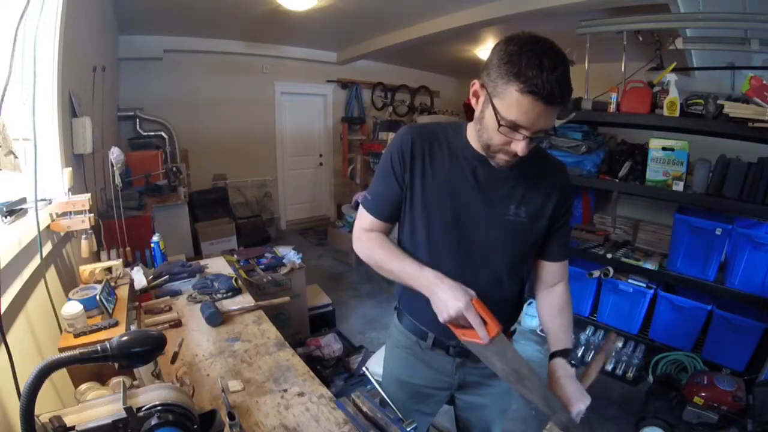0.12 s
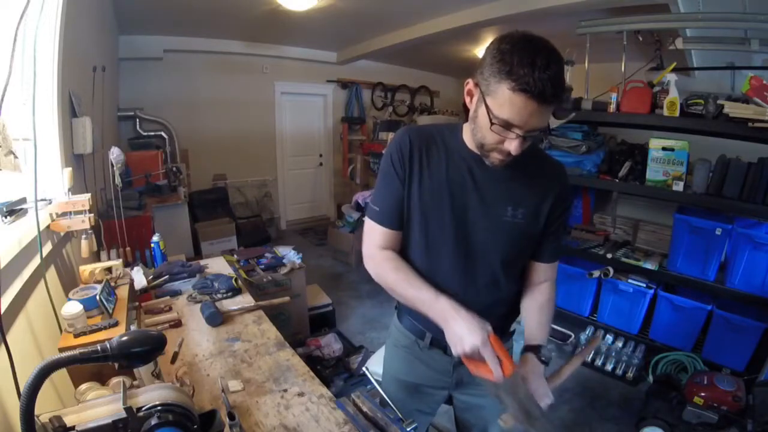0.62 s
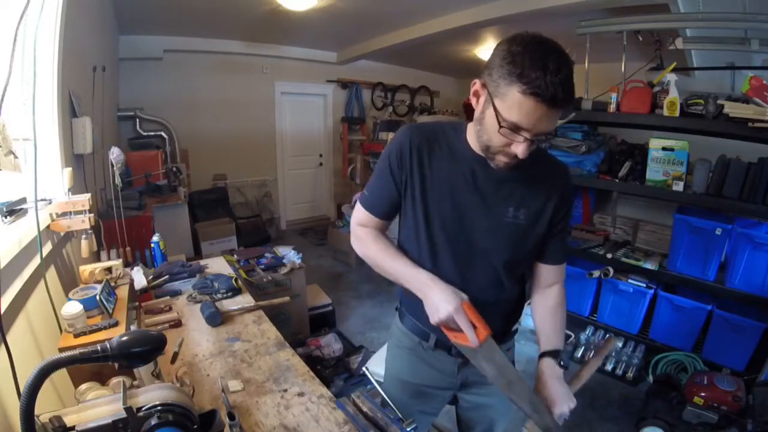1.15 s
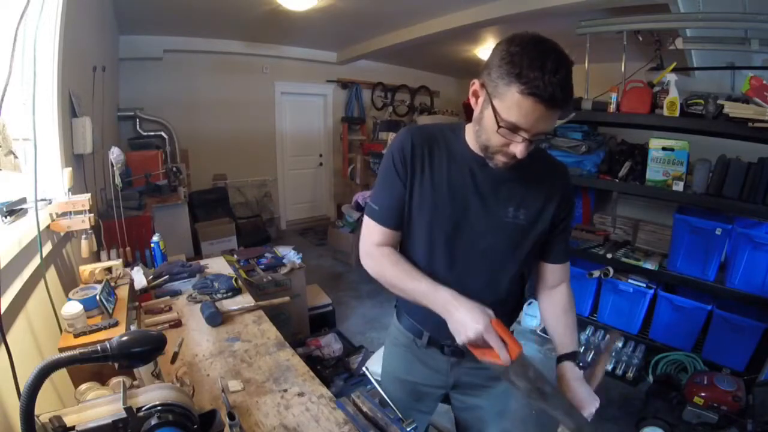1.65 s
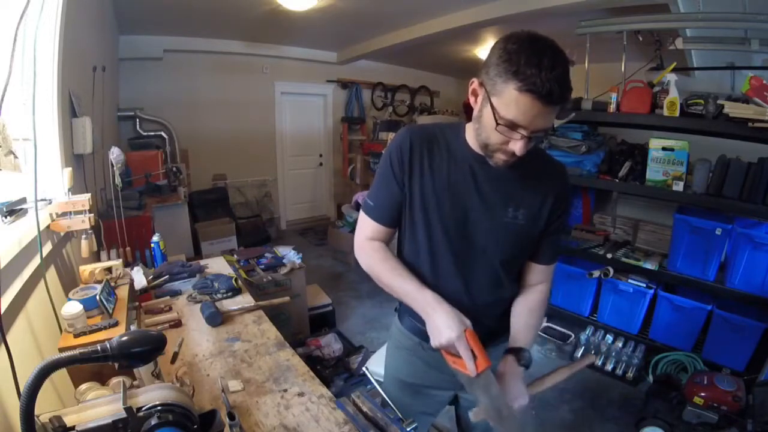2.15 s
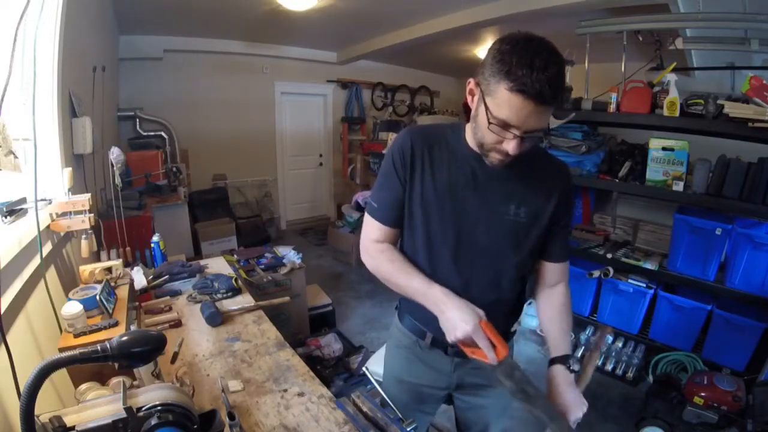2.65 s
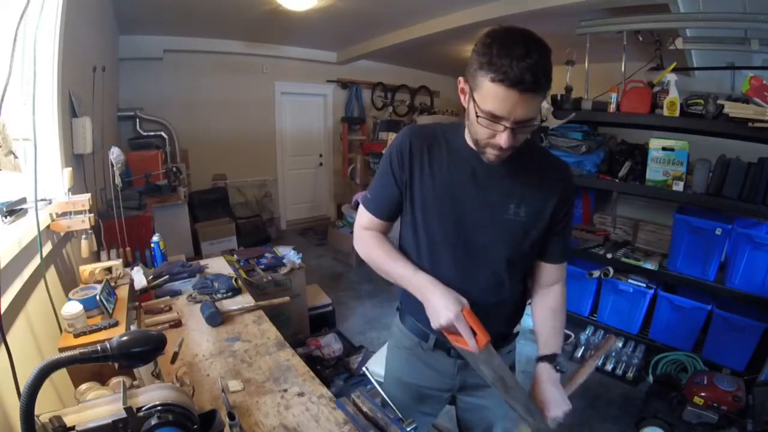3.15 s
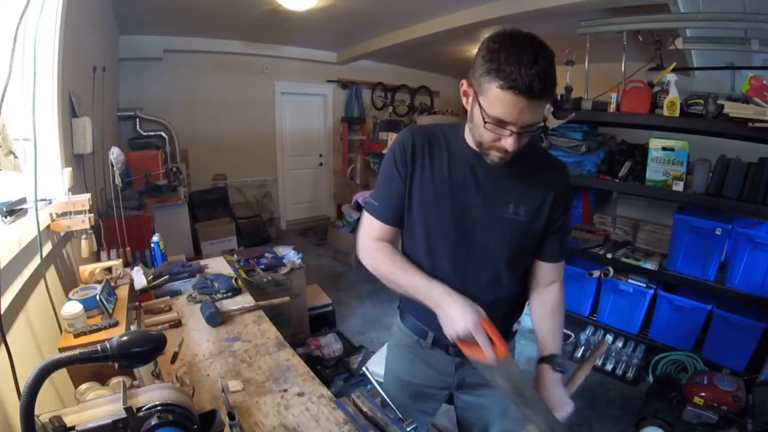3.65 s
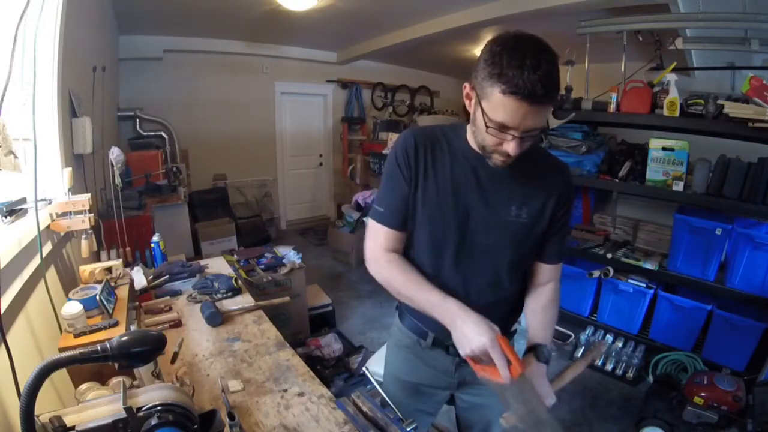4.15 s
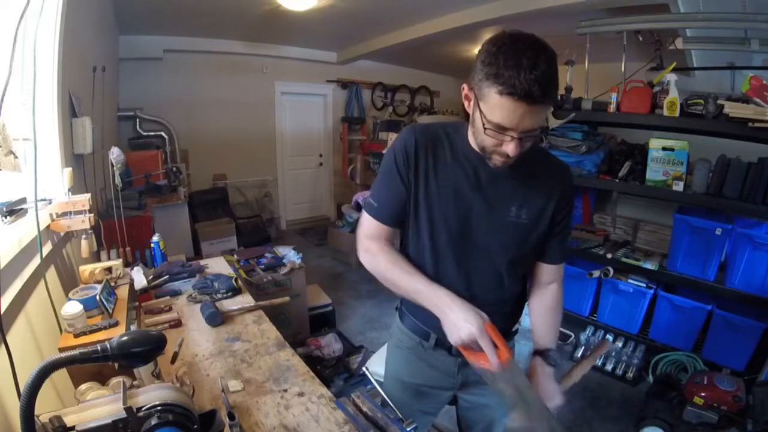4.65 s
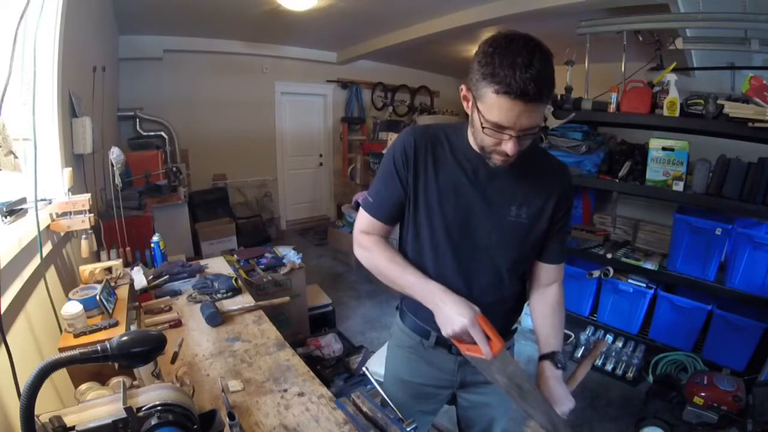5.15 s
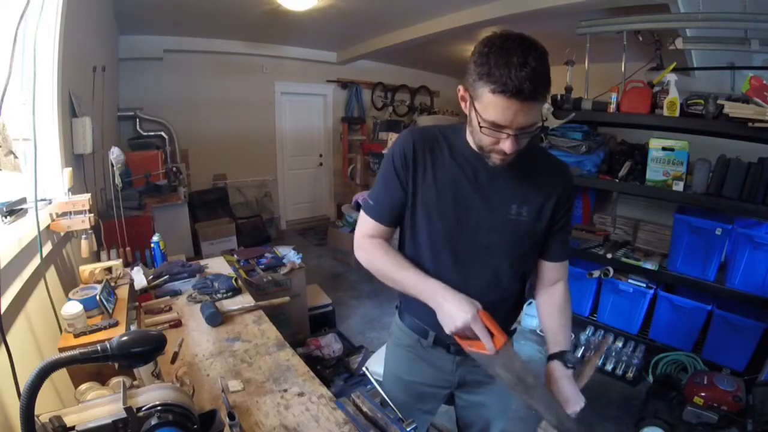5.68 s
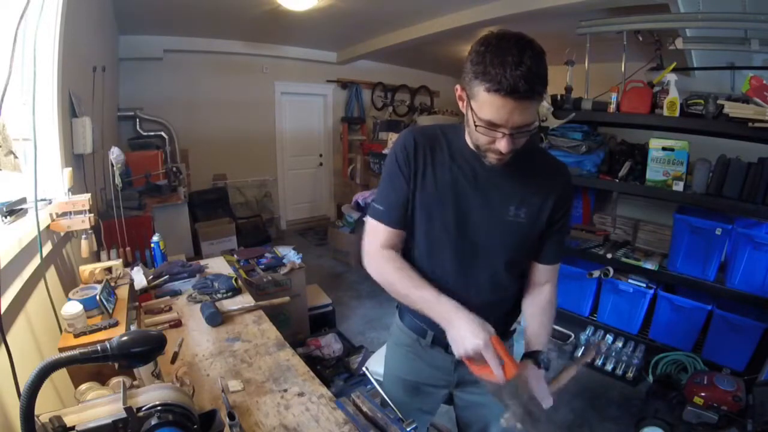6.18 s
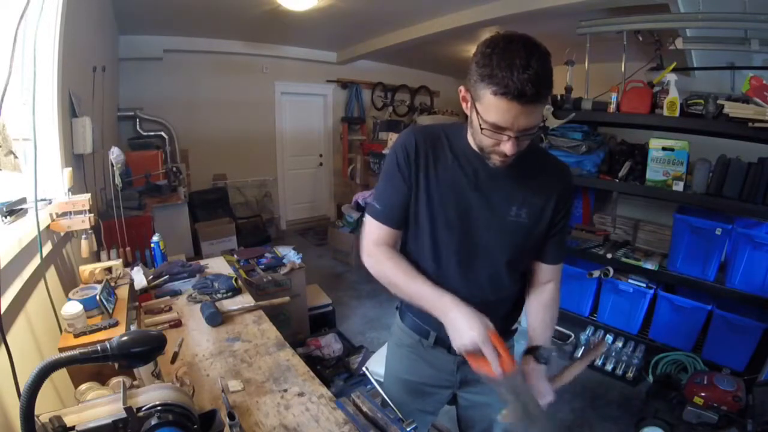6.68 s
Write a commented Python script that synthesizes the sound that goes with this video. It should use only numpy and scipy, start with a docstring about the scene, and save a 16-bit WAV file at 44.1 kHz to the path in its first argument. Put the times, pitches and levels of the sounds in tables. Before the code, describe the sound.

Close, dry-edged rasping of saw teeth in wood, louder on the push and thinner on the pull. Strokes start hesitantly, stop for over a second of small scrapes, then run quickly and regularly before another short halt and a sharp restart. Short metallic notes and snagging bursts colour the rasp. The hard garage adds a brief diffuse tail, with faint hum and hiss underneath.

```python
"""Garage: a hand saw cuts a wooden handle in quick strokes with short pauses.
Pulsed noise, the tearing fibres, drives resonances of the body and blade; its level follows the arm speed.
On each push the tooth rate sweeps up and down as a pitch. The steel blade sings short notes and the
teeth catch in brief noise bursts.
The garage answers with a short tail of decaying noise, over a low hum and hiss of filtered noise."""
import sys
import numpy as np
from scipy import signal
from scipy.fft import rfft, irfft, next_fast_len
from scipy.io import wavfile
from scipy.ndimage import map_coordinates

SR = 44100
rng = np.random.default_rng(int(sys.argv[2]) if len(sys.argv) > 2 else 0)


def amplitude_ratio(level_db):
    """Convert a level in decibels to the matching linear amplitude (field) ratio."""
    exponent = np.asarray(level_db, float) / 20
    return 10 ** exponent


def bounce(signal):
    """Save signal as a 16-bit WAV file at the path given by the first command-line argument."""
    frames = np.transpose(np.atleast_2d(signal))
    limited = np.clip(frames, -1, 1)
    pcm = np.round(limited * 32767).astype(np.int16)
    wavfile.write(sys.argv[1], SR, pcm)


N = 299880
TIME = np.arange(N) / SR

# push strokes, levels before layer trims:
# (start [s], fastest [s], end [s], rasp level [dB], body over rasp [dB])
PUSH_STROKES = [(0.423, 0.526, 0.64, -26, -7), (0.823, 0.925, 0.98, -23.5, -7.5),
                (1.153, 1.258, 1.307, -24, -9), (1.77, 1.867, 1.932, -23.5, -9),
                (2.796, 2.902, 2.96, -25.5, -6.5), (3.14, 3.239, 3.28, -25.5, -8),
                (3.436, 3.532, 3.62, -26, -10.5), (3.75, 3.831, 3.89, -24.5, -7.5),
                (4.067, 4.14, 4.245, -24.5, -8.5), (4.333, 4.426, 4.47, -24.5, -9.5),
                (4.62, 4.684, 4.756, -25, -6.5), (4.899, 4.958, 5.03, -23.5, -9),
                (5.16, 5.236, 5.29, -24.5, -7.5), (5.989, 6.112, 6.17, -24, -7),
                (6.331, 6.422, 6.466, -24.5, -7.5), (6.622, 6.706, 6.75, -24.5, -8.5)]
# modes of blade and handle: (centre [Hz], width [Hz], relative level [dB])
BODY_MODES = [(357, 18, -15), (497, 97, 1.5), (602, 121, -3), (872, 57, 7), (1036, 150, 1), (1104, 37, 7),
              (1335, 69, 1.5), (1382, 97, 10.5), (1466, 114, 1.5), (1540, 13.5, 3.5), (1693, 180, -14),
              (1980, 25, -35), (2085, 34, -1.5), (2264, 60, 7), (2730, 250, -9)]
# rasp noise colour: (frequency [Hz], relative density [dB per Hz])
RASP_SPECTRUM = [(150, -83), (250, -17.5), (435, -18.5), (799, -10), (870, -14), (1330, -2), (3120, -10),
                 (4700, -5.5), (5420, -12), (6330, -8), (7400, -41.5), (9620, -34), (16300, -120)]


def unit(x):
    """x at rms 1."""
    return x / np.sqrt(np.mean(x ** 2) + 1e-20)


def along(points, hz):
    """Interpolates (Hz, value) points on a log frequency axis."""
    f, v = np.transpose(points)
    return np.interp(np.log(hz + 1), np.log(f + 1), v)


def wobble(knots_per_s):
    """Smooth random curve through normally distributed knots."""
    knots = rng.standard_normal(int(N * knots_per_s / SR) + 4)
    return map_coordinates(knots, [TIME * knots_per_s])


def filtered(x, response):
    """x times a complex response of frequency."""
    m = next_fast_len(N + SR // 2)
    return irfft(rfft(x, m) * response(np.fft.rfftfreq(m, 1 / SR)), m)[:N]


def coloured(x, spectrum):
    """x through a (Hz, dB) spectrum, at rms 1."""
    return unit(filtered(x, lambda hz: amplitude_ratio(along(spectrum, hz))))


def rung(x, modes, damp_db):
    """Parallel resonances at rms 1; kerf and hand damp each mode differently as the blade slides."""
    total = 0
    for k, (centre_hz, width_hz, db) in enumerate(modes):
        gain = amplitude_ratio(db + damp_db * wobble(14))
        mode = filtered(x, lambda f: 1j * f * width_hz / (centre_hz ** 2 - f * f + 1j * f * width_hz))
        total = total + (-1) ** k * gain * mode  # alternating signs
    return unit(total)


def room_floor():
    """Two filtered noises: a low hum of nearly even strength and a steady hiss."""
    # (frequency [Hz], relative density [dB per Hz])
    hum_spectrum = [(12, -8), (25, -8), (34, -5), (43, 0), (52, -6), (64, -18), (80, -40)]
    # (frequency [Hz], relative density [dB per Hz])
    hiss_spectrum = [(47, -4.5), (80, -5.5), (173, -15.5), (315, -15), (586, -21), (710, -22.5), (958, -24),
                     (1110, -19), (4110, -56), (6440, -26.5), (9270, -30), (12000, -42), (13300, -23.5)]
    hum = coloured(rng.standard_normal(N), hum_spectrum)
    hum = unit(hum / (.6 + np.abs(signal.hilbert(hum))))  # evens out the envelope
    hiss = coloured(rng.standard_normal(N), hiss_spectrum)
    return amplitude_ratio(-51.5) * hum + amplitude_ratio(-54.5) * hiss


def garage(x):
    """Noise tail, each frequency dying at its own speed; a fresh tail for each overlapping block."""
    # decay: (frequency [Hz], T60 [s])
    decay_times = [(300, 0.62), (1000, 0.47), (4000, 0.52), (8000, 0.44), (12000, 0.4)]
    step, delay_samples = SR // 5, 260
    padded = np.pad(x, (step, 2 * step))
    window = signal.windows.hann(2 * step, sym=False)
    out = np.zeros(N + 2 * SR)
    for at in range(0, N + step, step):
        hz, t, z = signal.stft(rng.standard_normal(SR * 2 // 3), SR, nperseg=256)
        decay = amplitude_ratio(-60 * t / along(decay_times, hz)[:, None])
        tail = signal.istft(z * decay, SR, nperseg=256)[1]
        wet = signal.fftconvolve(padded[at:at + 2 * step] * window, tail / np.linalg.norm(tail))
        out[at:at + len(wet)] += wet
    return np.pad(out[step:], (delay_samples, 0))[:N]


def singing():
    """Short unsteady sines of the blade, swelling fast and fading; some sag as the blade bends."""
    # steady notes: (start [s], length [s], pitch before waver [Hz], peak before flutter [dB])
    sung_notes = [(0.117, 0.062, 480, -50), (0.558, 0.055, 1463, -33.5), (0.716, 0.06, 885, -31),
                  (0.718, 0.052, 433, -43.5), (0.902, 0.13, 1300, -35.5), (1.086, 0.056, 876, -31),
                  (1.704, .06, 512, -47), (1.87, 0.088, 1556, -37), (1.876, 0.053, 1043, -41),
                  (2.205, 0.032, 968, -37.5), (2.249, 0.05, 514, -43), (2.876, 0.11, 1024, -39),
                  (2.929, 0.062, 1600, -39), (3.413, 0.052, 514.3, -39.5), (3.988, 0.094, 2076, -34),
                  (4.439, 0.039, 1033, -33), (4.717, 0.1, 1503, -39.5), (4.96, 0.059, 1025, -37.5),
                  (5.365, .05, 1598, -34.5), (6.095, 0.1, 1133, -35), (6.117, .03, 1700, -32),
                  (6.403, 0.037, 866, -37), (6.43, 0.11, 1550, -40), (6.516, 0.054, 964, -37.5)]
    # sagging notes: (start [s], length [s], peak before flutter [dB])
    sag_notes = [(1.249, 0.073, -39.5), (6.404, 0.1, -43), (6.689, 0.0745, -36)]
    sag_from_hz, sag_to_hz = 478, 343
    out, waver = np.zeros(N), 1 + .003 * wobble(70)
    notes = [(s, length_s, hz, hz, db) for s, length_s, hz, db in sung_notes]
    notes += [(s, length_s, sag_from_hz, sag_to_hz, db) for s, length_s, db in sag_notes]
    for s, length_s, first_hz, last_hz, db in notes:
        u = np.clip((TIME - s) / length_s, 0, 1)
        hz = last_hz + (first_hz - last_hz) * (1 - u) ** 2
        swell = np.sin(np.pi * u ** .65) ** .9
        out += amplitude_ratio(db) * swell * np.sin(2 * np.pi * np.cumsum(hz * waver) / SR)
    return out * amplitude_ratio(2 * wobble(60))  # flutter


def catches():
    """The teeth catch: sudden noise tears that die within some hundredths of a second."""
    # (start [s], nominal peak [dB])
    catch_times = [(0.115, -35), (0.436, -43), (1.701, -36), (1.809, -19), (2.21, -22.5), (3.793, -30),
                   (4.092, -23), (4.922, -26), (5.659, -38), (5.933, -48), (6.061, -21), (6.244, -16)]
    crest_db, t60_s = 9, .045  # crest: peak over rms
    start_s, peak_db = np.transpose(catch_times)
    since_s = TIME[:, None] - start_s
    decay = amplitude_ratio(peak_db - crest_db - 60 * np.abs(since_s) / t60_s)
    burst = np.sum(decay * (since_s > 0), axis=1)
    return burst * coloured(rng.standard_normal(N), [(1200, -17)] + RASP_SPECTRUM[6:])


def speeds(rows):
    """Blade speed 0-1, a row per stroke; the arm speeds up, then brakes."""
    return np.array([np.sin(np.pi / 2 * np.interp(TIME, row[:3], [0, 1, 0])) for row in rows])


def teeth():
    """Phase of the passing teeth and level of their tone, both following push speed."""
    # one row per push: (tooth rate at top speed, before unevenness [Hz], nominal level [dB])
    tooth_rates = [(950, -35), (1400, -28), (1000, -32), (1100, -36), (1050, -34), (1400, -36), (1250, -34),
                   (1370, -29.5), (1140, -29), (1250, -29), (1320, -32), (1350, -30), (1400, -34),
                   (1170, -28), (1330, -36), (1380, -31)]
    speed, (top_hz, db) = speeds(PUSH_STROKES), np.transpose(tooth_rates)
    rate_hz = top_hz @ speed ** 1.4
    level = amplitude_ratio(db) @ speed ** 14  # sounds only near top speed
    uneven = 1 + .025 * wobble(250)  # teeth are not quite evenly set
    phase = 2 * np.pi * np.cumsum(rate_hz * uneven) / SR
    return phase, level * amplitude_ratio(2.5 * wobble(90))


def tooth_tone(phase, level):
    """Three harmonics of the tooth rate, flaring where the pitch crosses a body mode."""
    tone = level * (np.sin(phase) + 0.31 * np.sin(2 * phase) + 0.12 * np.sin(3 * phase))
    return np.std(tone) * unit(.85 * unit(tone) + .5 * rung(tone, BODY_MODES, damp_db=0))


def strokes():
    """Envelopes of rasp, body, blade and edge: each follows the speed by its own power."""
    # pulls and light restarts, levels before layer trims:
    # (start [s], fastest [s], end [s], rasp level [dB], body over rasp [dB])
    pull_strokes = [(0.08, 0.135, 0.17, -39.5, -2), (0.646, 0.742, 0.82, -27, -4.5),
                    (0.97, 1.101, 1.17, -29, -5), (1.313, 1.436, 1.455, -27.5, -5.5),
                    (1.678, 1.722, 1.78, -38.0, -1.5), (2.193, 2.224, 2.382, -33.5, -4),
                    (2.29, 2.374, 2.418, -38, -2), (2.686, 2.751, 2.79, -41.5, -3),
                    (2.964, 3.054, 3.175, -30, -7.5), (3.285, 3.388, 3.46, -29, -7),
                    (3.601, 3.66, 3.79, -31.5, -4.5), (3.89, 3.995, 4.056, -29.5, -6.5),
                    (4.199, 4.287, 4.35, -27, -6.5), (4.484, 4.544, 4.66, -29, -6.5),
                    (4.743, 4.83, 4.904, -28.5, -6), (5.013, 5.09, 5.24, -30.5, -5.5),
                    (5.289, 5.394, 5.4, -26.5, -6), (5.631, 5.681, 5.685, -42, -2.5),
                    (5.914, 5.968, 5.99, -39, -2), (6.162, 6.279, 6.39, -30, -4.5),
                    (6.474, 6.552, 6.639, -29.5, -7.0)]
    rasp_power, body_power, blade_power, edge_power = 2.16, 1.6, 2.09, 2.4
    blade_over_rasp_db, edge_over_rasp_db = (-6.5, -3.5), (-16, -11.5)  # (push, pull)
    body_surge_db, blade_surge_db, surge_power = -4, -6, 40  # brief surge at top push speed
    blade_growth_db_per_s, body_lag_s = 0.3651, .004  # blade gains as the cut goes on
    rows = np.array(PUSH_STROKES + pull_strokes)
    pulled = (np.arange(len(rows)) >= len(PUSH_STROKES)) * 1
    speed, fastest_s, rasp_db = speeds(rows), rows[:, 1], rows[:, 3]
    peak = (1 - pulled[:, None]) * speed ** surge_power

    def layer(db, power, surge):
        return np.sqrt(amplitude_ratio(db) ** 2 @ (speed ** power + surge * peak) ** 2)

    body = layer(rasp_db + rows[:, 4], body_power, amplitude_ratio(body_surge_db))
    body = np.interp(TIME - body_lag_s, TIME, body)
    blade_db = rasp_db + np.take(blade_over_rasp_db, pulled) + blade_growth_db_per_s * fastest_s
    blade = layer(blade_db, blade_power, amplitude_ratio(blade_surge_db))
    edge = layer(rasp_db + np.take(edge_over_rasp_db, pulled), edge_power, 0)
    return layer(rasp_db, rasp_power, 0), body, blade, edge


def snags():
    """Single teeth snag: gain jumps at random and falls back within a few ms."""
    bites_per_s, fall_s, bite_db = 45, .003, 3
    hits = (rng.random(N) < bites_per_s / SR) * rng.exponential(1, N)
    snag = signal.lfilter([1], [1, -np.exp(-1 / (fall_s * SR))], hits)
    return amplitude_ratio(bite_db * np.minimum(snag, 3 / 2))


def fibres(clump_db, bite):
    """Tearing fibres: noise in clumps a few ms long, times the bite gain."""
    return unit(rng.standard_normal(N) * amplitude_ratio(clump_db * wobble(300) + 0.6 * clump_db * wobble(70)) * bite)


def saw(phase, level):
    """Fibres, pulsed by the teeth, drive the body, two groups of blade modes and a thin edge."""
    # lower blade modes: (centre [Hz], width [Hz], relative level [dB])
    blade_modes = [(2767, 53, -5.5), (3070, 83, -44), (3726, 39, -4), (4590, 40, -43), (4580, 170, -2.5),
                   (4755, 40, 9.5), (4940, 260, 1.5), (5220, 48, 8.5)]
    # top blade modes: (centre [Hz], width [Hz], relative level [dB])
    top_modes = [(5790, 220, -3), (5940, 37, 4), (6370, 345, -1.5), (6392, 86, -0.5), (6540, 160, -1.5)]
    # edge noise colour: (frequency [Hz], relative density [dB per Hz])
    edge_spectrum = [(4120, -33.5), (7000, -11.5), (7370, -2.5), (9000, -4), (10100, -20), (11200, -8.5),
                     (12700, -58), (13300, -71)]
    # the teeth grip unevenly along a stroke
    rasp, body, blade, edge = (envelope * amplitude_ratio(1.1 * np.tanh(wobble(28))) for envelope in strokes())
    bite = 1 + 0.42 * (level > 0) * np.cos(phase)
    woody, steely = fibres(2.24, bite), fibres(0.51, bite * snags())

    low_spectrum = RASP_SPECTRUM[:7] + [(4000, -77)]
    mid_spectrum = [(1800, -27.5)] + RASP_SPECTRUM[6:8] + [(6200, -32.5)]
    high_spectrum = [(4600, -56.0)] + RASP_SPECTRUM[8:]
    low = 0.73 * rung(body * woody, BODY_MODES, damp_db=3)
    low += 0.67 * coloured(body * woody, low_spectrum)
    mid = 0.71 * rung(blade * steely, blade_modes, damp_db=-2.0)
    mid += 0.6 * coloured(blade * steely, mid_spectrum)
    high = 0.99 * rung(rasp * steely, top_modes, damp_db=4.5)
    high += 0.55 * coloured(rasp * steely, high_spectrum)
    thin = coloured(edge * fibres(1.0, bite), edge_spectrum)

    def rms(envelope):
        return np.sqrt(np.mean(envelope ** 2))

    rasping = amplitude_ratio(-1.0) * rms(body) * low + amplitude_ratio(-1.5) * rms(blade) * mid
    rasping += amplitude_ratio(-4.5) * rms(rasp) * high
    return rasping + amplitude_ratio(-0.5) * rms(edge) * thin


def scene():
    """Saw and blade in the garage, with its tail, hum and hiss."""
    # tail gain: (frequency [Hz], level [dB])
    wet_gain = [(500, -3.5), (1500, -2.5), (3800, -5), (6300, -10), (9000, -6.5)]
    notes_wet_db = -5  # the notes leave less tail than the rasp
    phase, level = teeth()
    rasp = saw(phase, level) + catches()
    notes = tooth_tone(phase, level) + singing()
    tail = garage(rasp + amplitude_ratio(notes_wet_db) * notes)
    tail = filtered(tail, lambda hz: amplitude_ratio(along(wet_gain, hz)))
    return (rasp + notes + tail + room_floor())[None]


def band_limit(x):
    """A steep low-pass at the top of the band."""
    return signal.sosfilt(signal.butter(12, 13490, fs=SR, output="sos"), x)


def record(dry):
    """The microphone has a treble peak and fades at the top."""
    # microphone response: (frequency [Hz], gain [dB])
    mic_response = [(5900, 1), (6450, 4.5), (6850, 0.5), (9500, -2.5), (11000, -7), (12200, -10.5),
                    (13300, -34), (14000, -77)]
    heard = filtered(dry[0], lambda hz: amplitude_ratio(along(mic_response, hz)))
    return band_limit(heard[None])


dry = scene()
out = record(dry)
bounce(out)
```